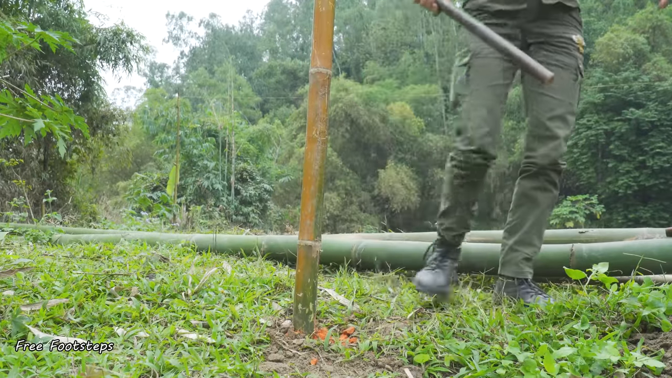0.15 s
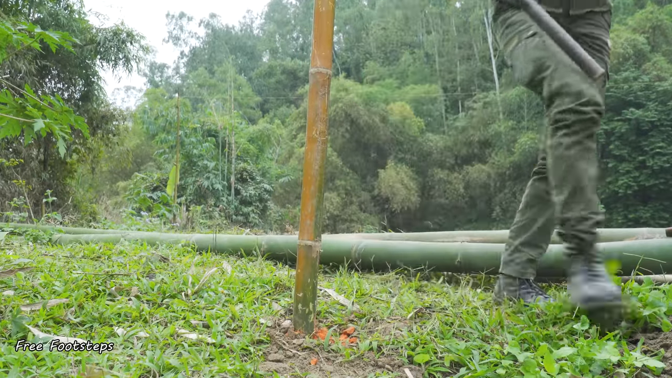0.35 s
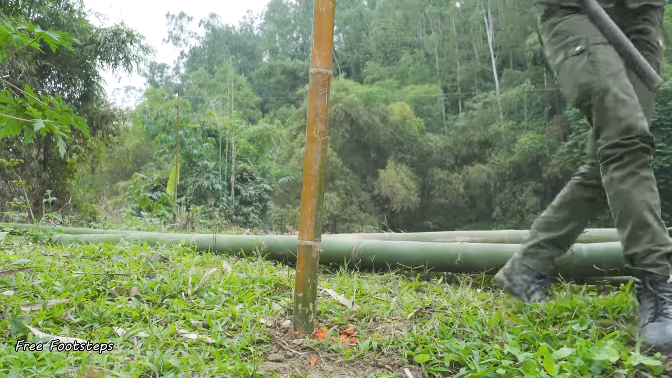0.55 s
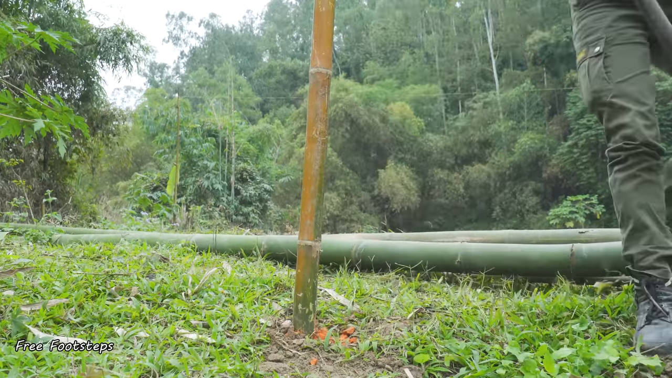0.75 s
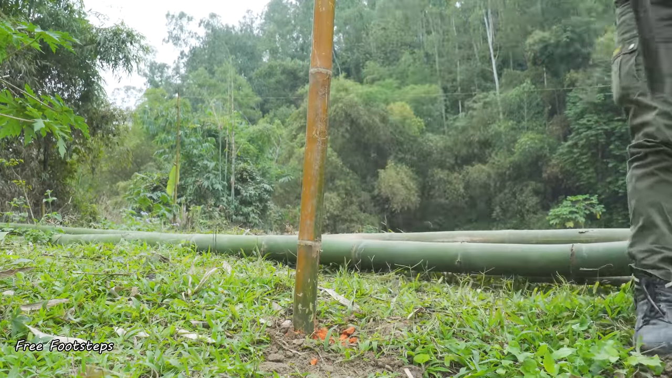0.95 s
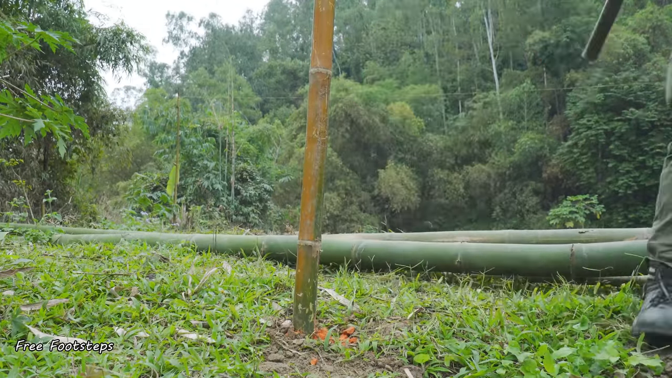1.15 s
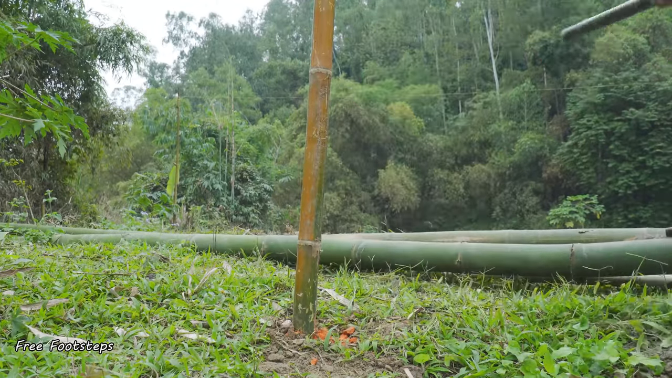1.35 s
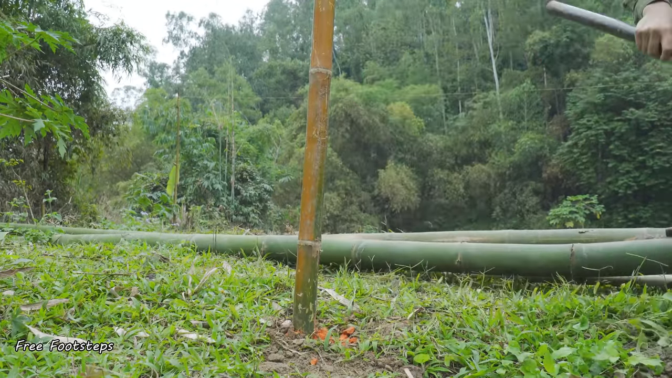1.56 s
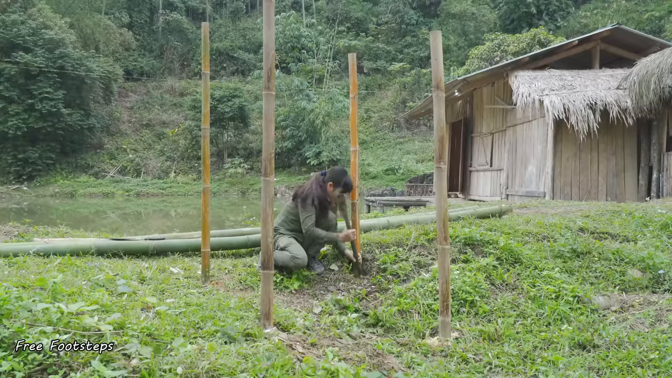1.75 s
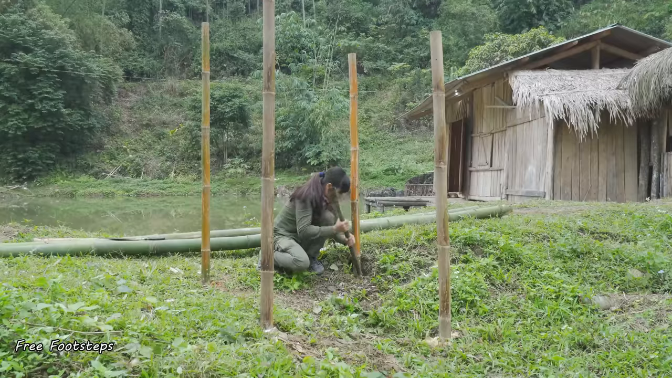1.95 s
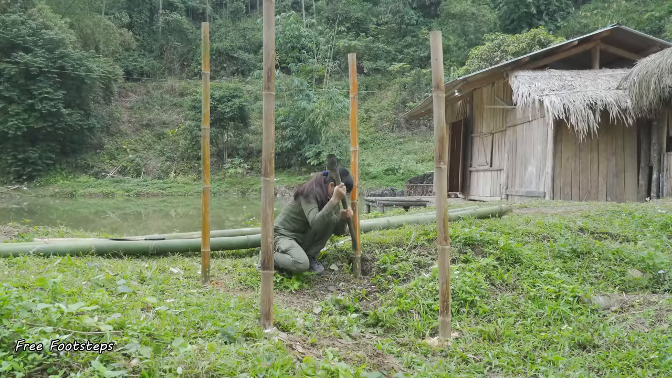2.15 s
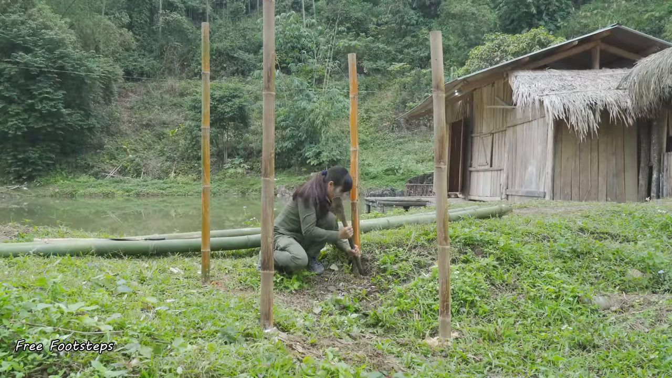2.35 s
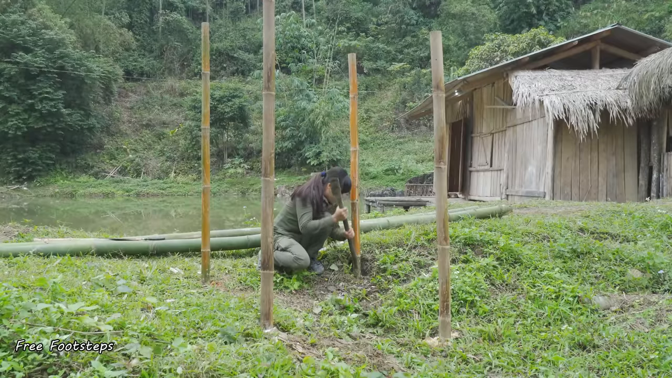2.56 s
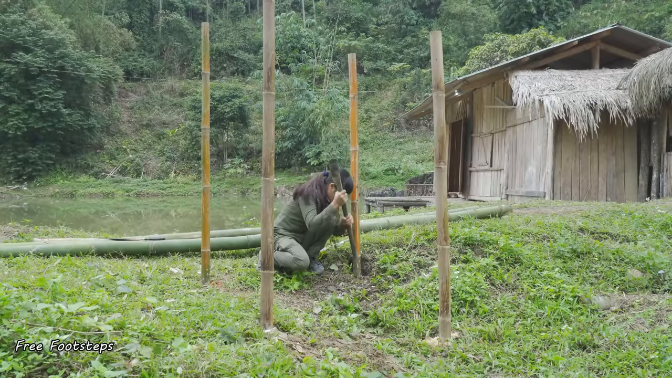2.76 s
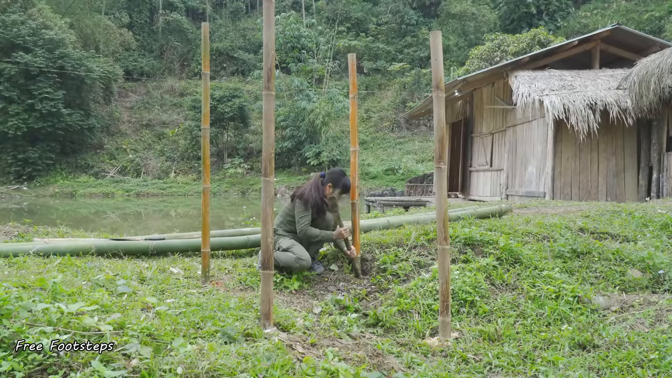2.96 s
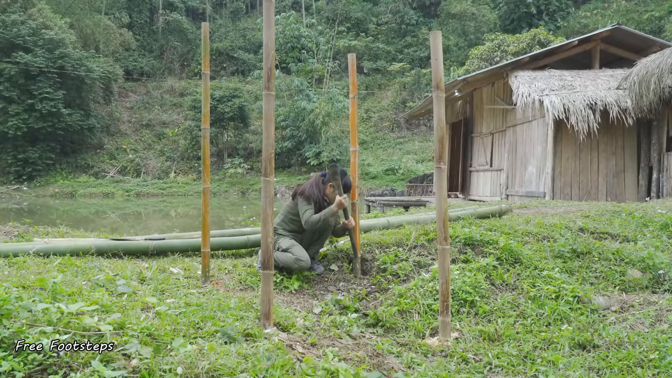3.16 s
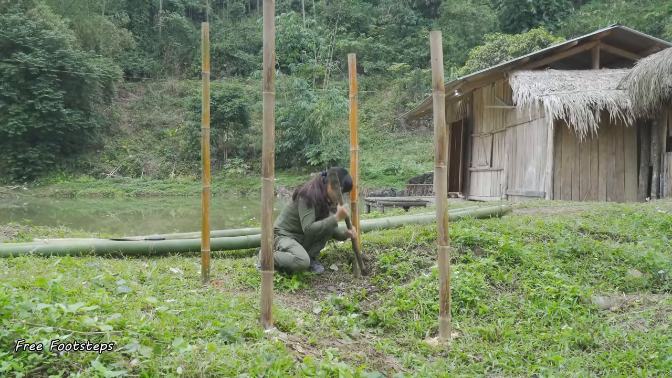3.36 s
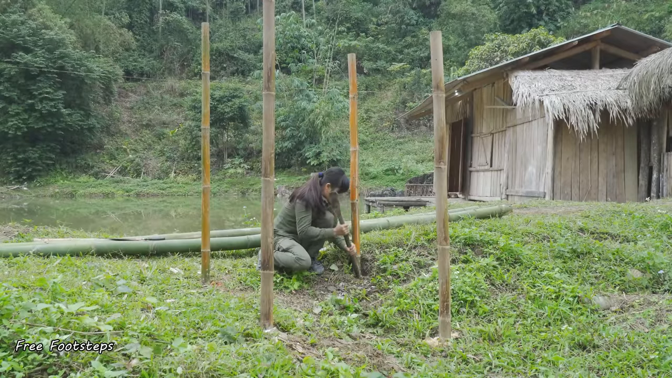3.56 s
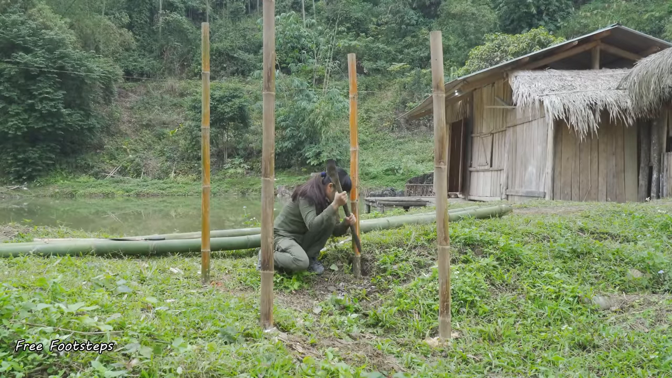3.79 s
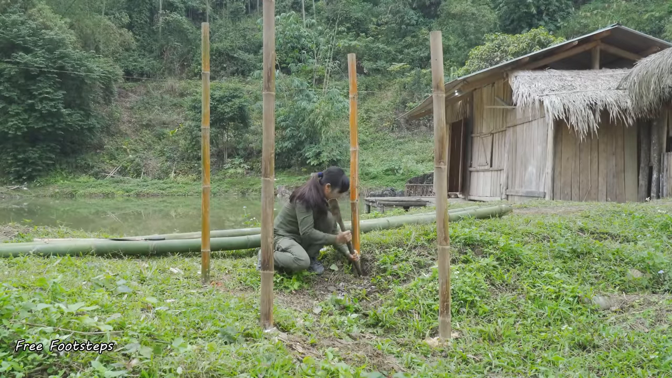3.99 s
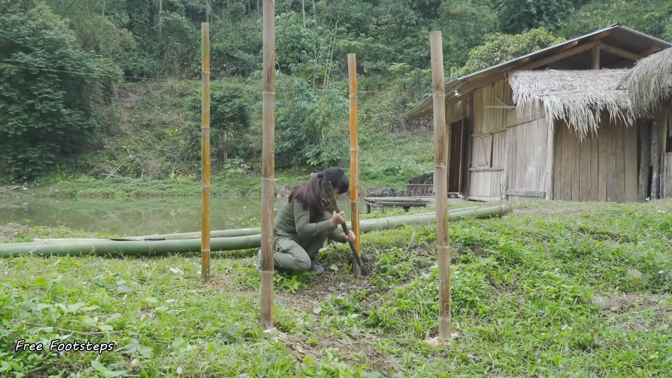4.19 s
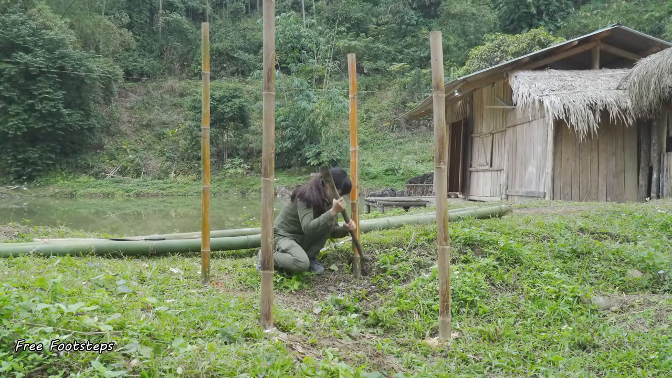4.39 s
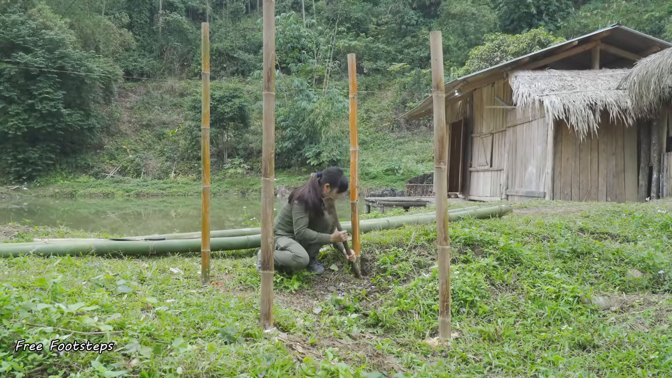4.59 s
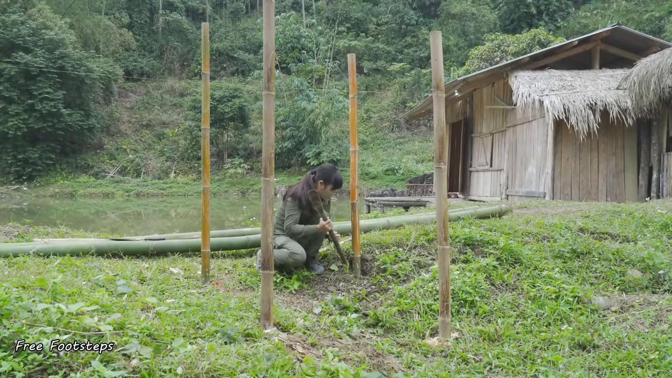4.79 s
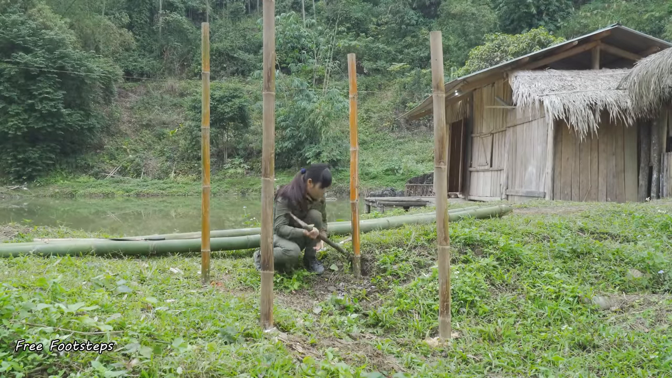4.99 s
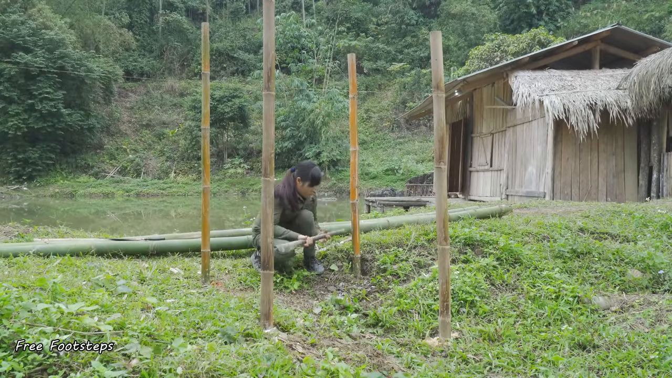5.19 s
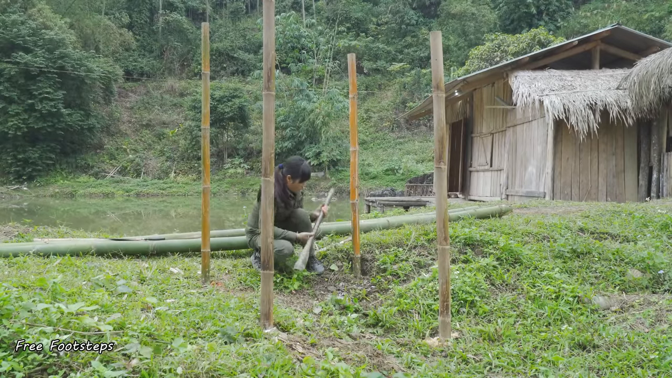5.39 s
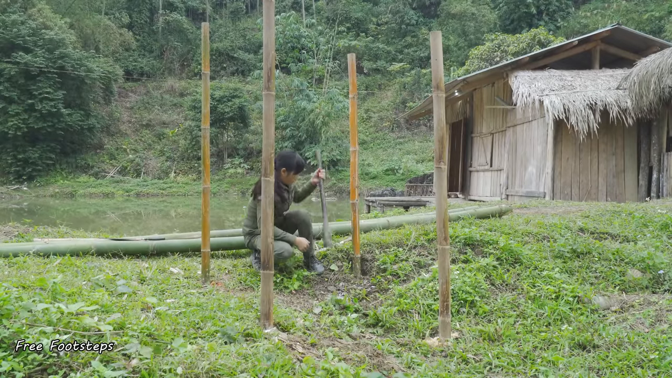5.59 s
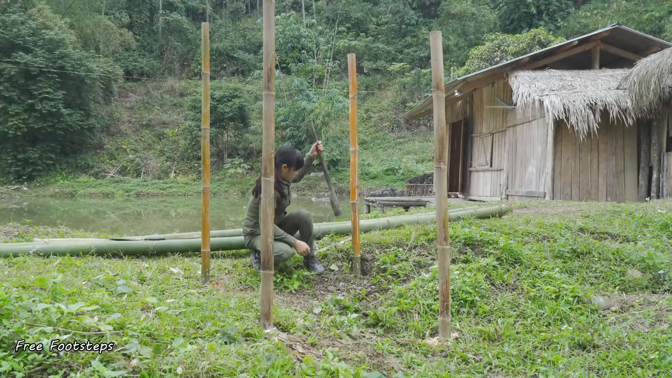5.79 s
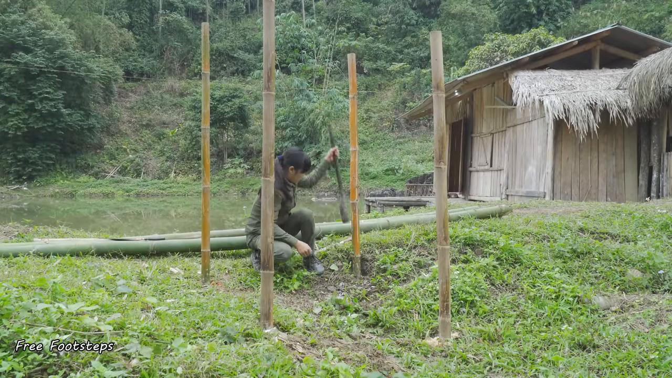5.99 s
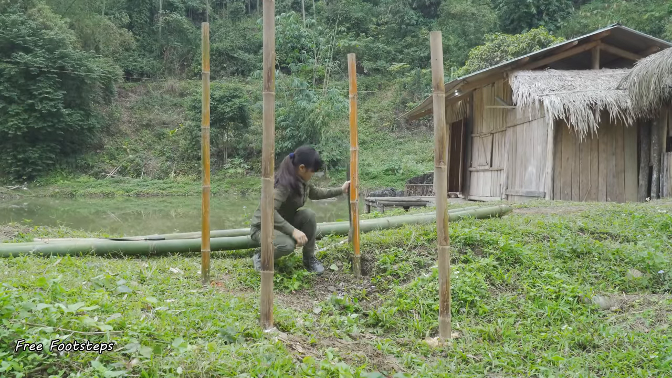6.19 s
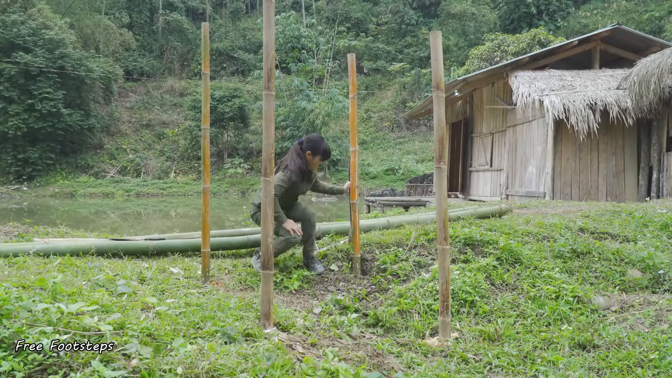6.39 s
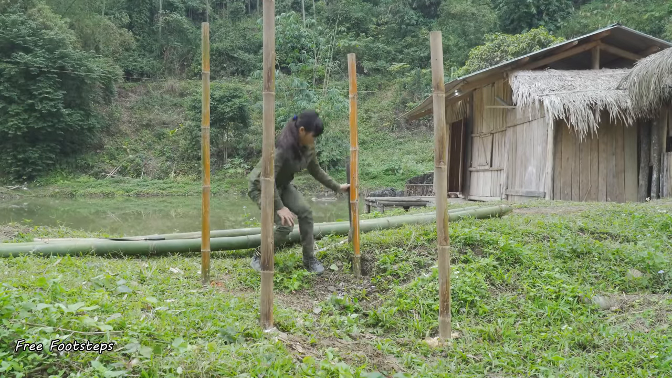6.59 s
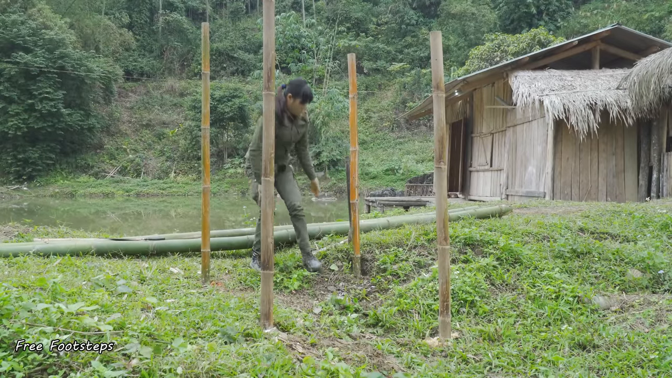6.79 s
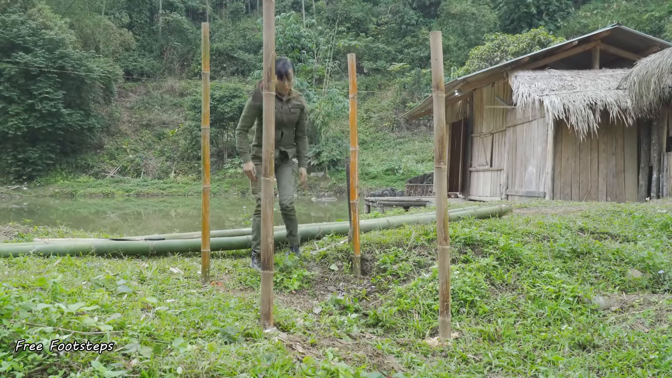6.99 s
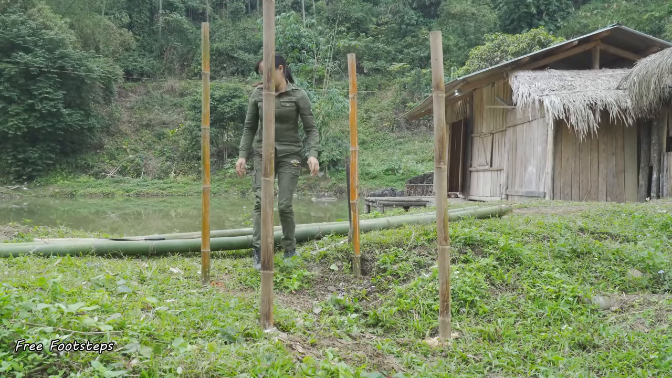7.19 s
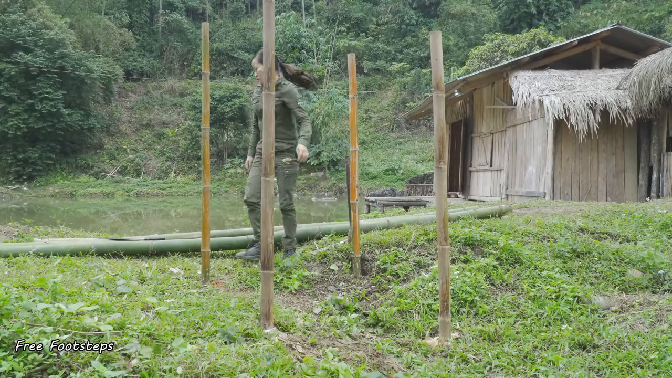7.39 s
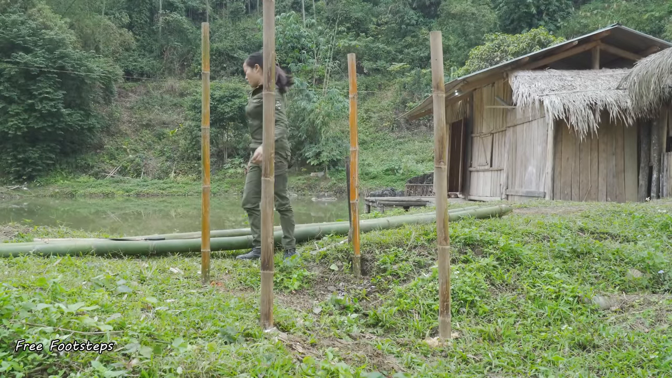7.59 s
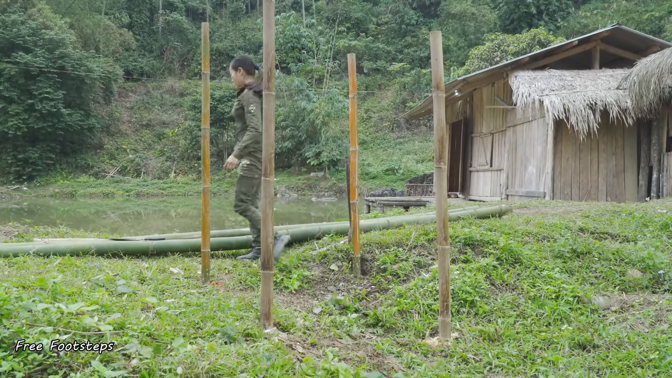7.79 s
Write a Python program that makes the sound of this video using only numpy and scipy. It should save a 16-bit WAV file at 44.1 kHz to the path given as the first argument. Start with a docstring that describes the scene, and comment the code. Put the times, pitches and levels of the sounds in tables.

```python
"""Boots rustle through grass, then a steel bar pounds the soil around a bamboo post in a yard by a hut.
Each blow cracks as filtered noise, rings bar and post as dying sines, thumps the ground and shakes the
microphone stand; delayed and scattered copies echo it off hut and hillside.
Birds or insects trill in the distance as trains of sliding whistles, over the noise hush of a wooded valley."""
import sys
import numpy as np
from scipy import signal
from scipy.fft import rfft, irfft
from scipy.io import wavfile
from scipy.ndimage import uniform_filter1d

SR = 44100
rng = np.random.default_rng(int(sys.argv[2]) if len(sys.argv) > 2 else 0)


def file_out(sig):
    """Save sig as 16-bit WAV at sys.argv[1]."""
    # one column per channel
    cols = np.atleast_2d(sig).T
    # limit, then scale
    lim = np.clip(cols, -1, 1)
    pcm = np.round(lim * 32767).astype(np.int16)
    wavfile.write(sys.argv[1], SR, pcm)


N = 346185  # length in samples


def amp(db):
    """dB to gain."""
    return 10 ** (np.asarray(db) / 20)


def evened(x):
    """Scales to rms 1."""
    return x / np.sqrt(np.mean(x ** 2) + 1e-20)


def read(points, hz):
    """Reads a (Hz, value) table on a log-frequency axis."""
    f, value = np.transpose(points)
    return np.interp(np.log(hz + 1), np.log(f + 1), value)


def add(mix, start_s, sound):
    """Mixes a sound in at its start time, cut off at the end of the mix."""
    part = mix[round(start_s * SR):][:len(sound)]
    part += sound[:len(part)]


def coloured(x, points):
    """Shapes the spectrum of x by a table, then scales to rms 1."""
    spectrum = rfft(x) * amp(read(points, np.fft.rfftfreq(len(x), 1 / SR)))
    return evened(irfft(spectrum, len(x)))


def band(x, lo_hz, hi_hz):
    """Causal band-pass."""
    edges = [lo_hz, min(hi_hz, SR / 2.2)]
    return signal.sosfilt(signal.butter(2, edges, "band", fs=SR, output="sos"), x)


def drift(size):
    """Slow random wandering of rms 1, smoothed twice over size samples."""
    once = uniform_filter1d(rng.standard_normal(N), size)
    return evened(uniform_filter1d(once, size))


def flutter(size, length=N):
    """Quicker random wandering of rms 1, smoothed once over size samples."""
    return evened(uniform_filter1d(rng.standard_normal(length), size))


def ring(modes, length, spread_db):
    """Dying sines of peak 1; random mode levels, as each strike point favours other modes."""
    t = np.arange(length) / SR
    out = np.zeros(length)
    for hz, db, t60_s in modes:
        luck_db = spread_db * rng.standard_normal()
        out += amp(db + luck_db - 60 * t / t60_s) * np.sin(2 * np.pi * hz * t)
    return out / abs(out).max()


def scatter(decays, swell_s):
    """Dense reflections of energy 1 that swell in, each band dying at its own speed."""
    hz, t, z = signal.stft(rng.standard_normal(SR + SR // 2), SR, nperseg=256)
    tail = signal.istft(z * amp(-60 * t / read(decays, hz)[:, None]), SR, nperseg=256)[1]
    tail = tail * np.clip(np.arange(len(tail)) / SR / swell_s, 0, 1) ** 2
    return tail / np.linalg.norm(tail)


# spectrum of the valley air: hz [Hz], density_db [dB, relative]
HUSH_SPECTRUM = [(12, -23.5), (20, 4.5), (116, -3.5), (558, -13), (802, -10), (1090, -8.5), (2020, -20.5),
                 (2530, -14.5), (3250, -20.5), (3740, -16), (4420, -22), (6180, -20.5), (7110, -32.5),
                 (12100, -33), (16000, -39)]
HUSH_RMS_DB, PATCH_DB = -55, 0.6


def valley_hush():
    """Valley air: random short-time spectra whose level varies in drifting patches of time and pitch."""
    frames, hz = N // 256 + 5, np.fft.rfftfreq(1024, 1 / SR)
    real, imaginary, patches = rng.standard_normal((frames, 513, 3)).T
    patches = evened(uniform_filter1d(uniform_filter1d(patches, 12, 0), 14, 1))
    level = amp(read(HUSH_SPECTRUM, hz)[:, None] + PATCH_DB * patches)
    air = signal.istft((real + 1j * imaginary) * level, nperseg=1024, noverlap=768)[1][:N]
    return amp(HUSH_RMS_DB) * evened(air)


# trills: start_s [s], end_s [s], mean_rate [notes per s], first_hz [Hz], last_hz [Hz],
# level_db [dB, before the random note strength]
TRILL_RUNS = [(.012, .752, 47, 3200, 3120, -48), (3.16, 3.2, 50, 3300, 3300, -57),
              (3.2755, 3.645, 53.5, 3350, 3250, -52), (3.8, 3.94, 45, 3700, 4000, -57),
              (4.12, 4.34, 45, 3700, 4350, -54), (4.44, 4.6, 45, 3700, 4350, -54),
              (4.8, 4.945, 45, 3900, 4350, -55), (5.1985, 5.672, 51.8, 3300, 3250, -51),
              (5.75, 5.91, 45, 4000, 3950, -57), (6.42, 6.6, 48, 4000, 3750, -57),
              (7.035, 7.07, 55, 3300, 3300, -58), (7.1005, 7.735, 51.4, 3300, 3230, -51.5),
              (7.17, 7.28, 45, 4100, 4400, -58), (7.53, 7.66, 45, 4150, 4250, -57)]
# single whistles: start_s [s], end_s [s], first_hz [Hz], last_hz [Hz], peak_db [dB]
SINGLE_WHISTLES = [(0.0, .012, 3550, 3250, -45), (.044, .064, 3850, 3200, -44),
                   (.322, .336, 3700, 3600, -49), (7.355, 7.435, 2400, 2950, -59.5),
                   (7.425, 7.5, 2930, 3000, -63)]
# breakpoints of the far warble: time_s [s], level_db [dB, relative], pitch_hz [Hz]
FAR_WARBLE = [(0.0, -55, 3670), (.39, -64.5, 3680), (.85, -62.5, 3710), (1.35, -56, 3664), (1.5, -67, 3795),
              (2.27, -61.5, 3905), (2.65, -64.5, 3950), (2.91, -74, 3790), (3.171, -59, 3725),
              (3.821, -70, 3790), (4.501, -75, 3800), (4.74, -54, 3774), (5.4, -63, 3800),
              (5.62, -64, 4030), (5.85, -62, 3960), (6.199, -61, 3980), (6.5, -67, 3865),
              (6.801, -60.5, 3604), (7.3, -66, 3580), (7.85, -71, 3785)]
# far scatter, for the trees here and for the hillside echoes: hz [Hz], t60_s [s]
FAR_DECAY = [(200, .5), (700, 0.6), (1400, 1.6), (4000, 0.53), (8000, 0.55)]
SLOWING_PER_S2 = 11  # a trill slows by this many notes per s each second
SLIDE_SHARE = .17  # each trill note slides down by this share of its pitch
WARBLE_SWING_DB, WARBLE_FLUTTER_DB, WARBLE_ROAM_HZ = 1.5, 2.4, 60
NOTE_STRENGTH_DB = 2.2  # random spread of note strength
WARBLE_DIRECT_DB, WARBLE_BLUR_DB, TRILL_BLUR_DB = -8, -6.5, -12


def notes(per_s, hz, fall_hz, duty):
    """A train of short whistles, each sliding down in pitch, with a weak octave."""
    turn = np.minimum(np.cumsum(per_s) / SR % 1 / duty, 1)  # progress through a note, 0 to 1
    phase = 2 * np.pi * np.cumsum(hz + fall_hz * (.5 - turn)) / SR
    return np.sin(np.pi * turn) ** 2 * (np.sin(phase) + .06 * np.sin(2 * phase))


def trills():
    """Trains of sliding whistles that slow as they run, and single gliding whistles."""
    out = np.zeros(N)
    for start_s, end_s, mean_rate, first_hz, last_hz, level_db in TRILL_RUNS:
        t = np.arange(0, end_s - start_s, 1 / SR)
        hz = np.linspace(first_hz, last_hz, len(t))
        rate = mean_rate - SLOWING_PER_S2 * (t - t.mean())
        add(out, start_s, amp(level_db) * notes(rate, hz, SLIDE_SHARE * hz, .6))
    out = out * amp(NOTE_STRENGTH_DB * flutter(900))
    for start_s, end_s, first_hz, last_hz, peak_db in SINGLE_WHISTLES:
        hz = np.linspace(first_hz, last_hz, round((end_s - start_s) * SR))
        whistle = np.hanning(len(hz)) ** .5 * np.sin(2 * np.pi * np.cumsum(hz) / SR)
        add(out, start_s, amp(peak_db) * whistle)
    return out


def far_warble():
    """An unbroken train of sliding whistles whose rate, pitch and level wander."""
    t, (time_s, level_db, pitch_hz) = np.arange(N) / SR, np.transpose(FAR_WARBLE)
    rate = 45 * (1 + .15 * flutter(1500))
    hz = np.interp(t, time_s, pitch_hz) + WARBLE_ROAM_HZ * drift(3000)
    wander_db = WARBLE_FLUTTER_DB * flutter(1500) + WARBLE_SWING_DB * drift(3000)
    return evened(notes(rate, hz, 430, 0.29)) * amp(np.interp(t, time_s, level_db) + wander_db)


def callers():
    """Trills, single whistles and the far warble, blurred by scattering off the trees."""
    near, far = trills(), far_warble()
    trees = scatter(FAR_DECAY, 0.0083)[:SR // 4]
    blurred = signal.fftconvolve(amp(TRILL_BLUR_DB) * near + amp(WARBLE_BLUR_DB) * far, trees)[:N]
    return near + amp(WARBLE_DIRECT_DB) * far + blurred


# brushes of grainy noise, mostly boots and cloth in grass, one short burst at the 6.18 s blow:
# peak_s [s], length_s [s], fine_db (rustle) [dB, before flicker], coarse_db (scuff) [dB, before flicker]
GRAINY_BRUSHES = [(0.023, 0.31, -60.5, -60), (.16, 0.47, -56.5, -57.5), (0.263, 0.07, -60, -57),
                  (0.448, 0.082, -53.5, -51.5), (0.53, 0.19, -44, -44.5), (0.665, .11, -48.5, -49),
                  (0.752, 0.12, -48, -51), (1.128, 0.17, -58.5, -51), (1.264, 0.16, -59, -54.5),
                  (1.335, 0.19, -47.5, -53), (1.475, 0.07, -53, -50.5), (1.754, 0.18, -59.5, -60.5),
                  (2.0, 0.074, -68, -74), (2.147, 0.12, -67, -64), (5.12, 0.17, -67, -63),
                  (5.319, 0.067, -66, -75), (5.44, .2, -65, -73), (6.18, 0.031, -45, -43),
                  (6.503, .2, -69, -67.5), (6.956, 0.24, -58.5, -68), (7.1, .16, -58.5, -57.5),
                  (7.302, 0.12, -58.5, -70), (7.423, 0.18, -64.5, -77), (7.68, .12, -66, -70),
                  (7.85, .1, -67, -77)]
# spectrum of the fine grains: hz [Hz], density_db [dB, relative]
FINE_SPECTRUM = [(1180, -48.5), (2000, -1), (2880, -2), (3140, 1), (4300, 0.5), (6200, -1), (11600, -7.5),
                 (16000, -15.5)]
# spectrum of the coarse grains: hz [Hz], density_db [dB, relative]
COARSE_SPECTRUM = [(35, -47.5), (60, 4.5), (324, 2.5), (360, 6), (494, 3), (1030, 5), (3540, -10),
                   (4000, -11), (5200, -43.5), (8800, -120)]
BRUSH_EDGE_DB = -13  # level half a length either side of the peak, relative to it
STIR_DB, STIR_SWING_DB = -68, 4  # the grass never lies quite still
FLICKER_DB = 1.6


def grain_texture(spectrum, grains_per_s):
    """Random grains of uneven size over steady noise, given a spectrum."""
    size = amp(3. * np.minimum(rng.exponential(1, N), 3.3))
    grains = size * (rng.random(N) < grains_per_s / SR) * rng.standard_normal(N)
    return coloured(evened(grains) + .5 * rng.standard_normal(N), spectrum)


def rustle():
    """Dense grains, mostly fine for blades and cloth, coarse for soles; each brush swells and fades."""
    t, (peak_s, length_s, fine_db, coarse_db) = np.arange(N) / SR, np.transpose(GRAINY_BRUSHES)
    sparse_t = t[::64]  # levels are worked out sparsely, then interpolated
    swell_db = BRUSH_EDGE_DB * (2 * (sparse_t - peak_s[:, None]) / length_s[:, None]) ** 2
    out = np.zeros(N)
    # only the coarse layer carries the constant stirring
    for spectrum, db, stir, per_s in ((FINE_SPECTRUM, fine_db, 0, 6000), (COARSE_SPECTRUM, coarse_db, 1, 1200)):
        brush_level = np.sqrt((amp(db[:, None] + swell_db) ** 2).sum(0))
        brushing = np.interp(t, sparse_t, brush_level)
        level = np.hypot(brushing, stir * amp(STIR_DB + STIR_SWING_DB * drift(2000)))
        out += grain_texture(spectrum, per_s) * level * amp(FLICKER_DB * flutter(500))
    return out


# stems and dry blades snapping: start_s [s], peak_db [dB], centre_hz [Hz], width [octaves]
STEM_SNAPS = [(.058, -44, 7800, 2.7), (.1644, -41, 12300, 2.7), (.177, -39.5, 580, 1.08),
              (.188, -43.5, 1360, 0.37), (.244, -36.5, 3630, 3.2), (.327, -41.5, 750, 0.65),
              (.445, -33, 1100, 3.9), (0.488, -43, 1060, 1.1), (.567, -34, 700, 2.6),
              (0.623, -32.5, 1410, 0.82), (.646, -31.5, 1310, 2.9), (0.703, -36.5, 685, 1.3),
              (.8335, -29.5, 3150, 13), (0.903, -44, 553, 0.66), (1.04, -44, 10200, 2.5),
              (1.065, -33, 11000, 4.2), (1.706, -44, 585, 1.2), (1.771, -57, 900, 1),
              (5.758, -52, 11000, 1.1), (7.1462, -39, 10600, 2.7), (7.3422, -49, 11000, 2.2),
              (7.707, -41, 990, 0.9), (7.795, -44, 690, 1.1)]
# thin blades die sooner: hz [Hz], t60_s [s]
SNAP_DECAY_BY_PITCH = [(1000, 0.03), (9000, 0.0099)]


def snaps():
    """Short dying bursts of noise around each centre, higher ones shorter."""
    out, t = np.zeros(N), np.arange(900) / SR
    for start_s, peak_db, centre_hz, octaves in STEM_SNAPS:
        half_width = 2 ** (octaves / 2)
        noise = rng.standard_normal(len(t)) * amp(-60 * t / read(SNAP_DECAY_BY_PITCH, centre_hz))
        burst = band(noise, centre_hz / half_width, centre_hz * half_width)
        add(out, start_s, amp(peak_db) * burst / abs(burst).max())
    return out


# smeared echoes off hut walls and roof: delay_s [s], level_db [dB]
HUT_ECHOES = [(0.03, -39), (0.063, -31.5), (.092, -34), (.122, -53.5)]
# near scatter: hz [Hz], t60_s [s]
YARD_DECAY = [(100, 0.066), (500, 0.28), (1400, 0.3), (4000, 0.23), (10000, 0.4)]
YARD_DB, HILL_DB = -14, -40.5
FAR_SLOPE_S, FAR_SLOPE_DB, FAR_SLOPE_BAND_HZ = .17, -38, (700, 1650)  # a late, slowly swelling echo


def yard(x):
    """Smeared echoes off the hut, near scatter and faint long tails off the hillside."""
    taps = np.zeros(SR // 5)
    for delay_s, level_db in HUT_ECHOES:
        smear = rng.standard_normal(600) * np.hanning(600) / np.sqrt(225)
        add(taps, delay_s, amp(level_db) * smear)
    out = signal.fftconvolve(band(x, 500, 5500), taps)[:N]
    out += amp(YARD_DB) * signal.fftconvolve(x, scatter(YARD_DECAY, 0.0071))[:N]
    late = signal.fftconvolve(band(x, *FAR_SLOPE_BAND_HZ), scatter(FAR_DECAY, 0.11))
    add(out, FAR_SLOPE_S, amp(FAR_SLOPE_DB) * late)
    hillside = signal.fftconvolve(band(x, 700, 4100), scatter(FAR_DECAY, 0.063))[:N]
    return out + amp(HILL_DB) * hillside


# what the ground carries: start_s [s], boom_db [dB], thump_db [dB], shake_db [dB]
GROUND_QUAKES = [(1.281, -41.5, -45, -49), (1.491, -42, -47, -38.5), (1.865, -37.5, -56, -29.5),
                 (2.45, -46.5, -45, -33.5), (2.981, -26.5, -24, -25.5), (3.525, -24.5, -32, -27.5),
                 (4.075, -37, -46.5, -31.5), (4.615, -22.5, -27.5, -26), (6.182, -35, -32.5, -32.5)]
# microphone stand swaying: hz [Hz], level_db [dB, relative], t60_s [s]
STAND_MODES = [(27.48, -7, 1.76), (33.4, -3.5, 0.59), (56, -2.5, 0.34)]
# air in the hollow post: hz [Hz], level_db [dB, relative], t60_s [s]
POST_AIR_MODES = [(160, 0, 0.29)]
# the soil heaving: hz [Hz], level_db [dB, relative], t60_s [s]
SOIL_MODES = [(105, -8, 0.037), (72, -9, .13)]


def ground_shake():
    """Low dying sines: the stand shakes, the hollow post booms and the soil thumps."""
    out = np.zeros(N)
    for start_s, boom_db, thump_db, shake_db in GROUND_QUAKES:
        add(out, start_s, amp(shake_db) * ring(STAND_MODES, SR, 1))
        add(out, start_s, amp(boom_db) * ring(POST_AIR_MODES, SR, 0))
        add(out, start_s, amp(thump_db) * ring(SOIL_MODES, SR, 0))
    return out


FAVOUR_DB = 9  # lost per octave by modes away from the crack


def struck(modes, crack_hz, share):
    """Favours the modes near the crack and scales each ring's length by the ring share."""
    return [(hz, db - FAVOUR_DB * abs(np.log2(hz / crack_hz)), t60_s * share) for hz, db, t60_s in modes]


# contacts of the bar, and at 4.634 s a close echo of the blow before it:
# start_s [s], crack_db [dB], crack_hz [Hz], thud_db [dB], thud_hz [Hz], post_db [dB], bar_db [dB],
# grit_db [dB], crumble_t60_s [s], ring_share [factor on ring length]; each dB is a layer's gain
BLOW_SOUNDS = [(1.2729, -31.5, 1200, -21, 292, -17, -28.5, -41, 0.11, 0.9),
               (1.338, -54, 1500, -58, 200, -39, -50.5, -48, 0.04, .7),
               (1.481, -23, 800, -35, 502, -55, -35, -48, 0.011, 0.83),
               (1.4867, -23, 600, -26.5, 463, -42, -59, -53, 0.038, 0.77),
               (1.519, -46, 740, -37, 270, -39, -40, -55, .045, 0.6),
               (1.8499, -18, 2190, -14.5, 484, -21, -36, -66, 0.04, .8),
               (1.855, -26.5, 1400, -12.5, 487, -7, -8.5, -108, 0.12, 0.39),
               (1.8608, -20, 1400, -8, 284, -6.5, -15, -93, 0.08, 0.57),
               (2.427, -56, 2300, -30.5, 155, -51, -42, -48.5, 0.065, .7),
               (2.437, -50, 2300, -38, 198, -51, -41.5, -61, 0.031, 1.1),
               (2.4427, -36.5, 1200, -29, 278, -19.5, -26, -37, 0.056, 0.48),
               (2.9765, -14, 3150, -4.5, 217, -8.5, -5, -27, 0.073, 0.69),
               (2.9858, -10.5, 1010, -16, 513, -18, -5, -23.5, 0.054, 0.3),
               (3.519, -4, 2130, -4.5, 230, -2.5, -41, -37.5, 0.02, 0.56),
               (3.525, -5, 890, -10.5, 381, -25, -26.5, -24.5, 0.018, 1),
               (3.529, -22, 1440, -22, 419, -9.5, -12, -26, 0.12, 0.56),
               (4.057, -33, 740, -25.5, 266, -52, -61, -70, 0.054, .7),
               (4.069, -56, 3333, -13, 277, -16, -17, -35.5, 0.062, .6),
               (4.608, -7.5, 2800, -11, 220, -0.5, 2.5, -39, 0.043, 0.96),
               (4.634, -30, 2500, -24, 200, -11.5, -15, -47.5, 0.087, 0.75),
               (6.1181, -39, 1250, -67.5, 390, -28, -57, -66, 0.053, 0.53),
               (6.1755, -27.5, 3780, -20, 179, -52, -50.5, -34, 0.02, 0.58),
               (6.179, -24, 1680, -32.5, 278, -29, -43, -31, 0.023, .6)]
# rings of the post: hz [Hz], level_db [dB, relative], t60_s [s, before ring_share]
POST_MODES = [(420, -4, .03), (540, -6, .03), (860, -1, .035), (1150, -2, .055), (1385, 0, .06),
              (1468, -1, .07), (1555, -4, .05), (1640, -1, .07), (1918, -4, .04)]
# rings of the bar: hz [Hz], level_db [dB, relative], t60_s [s, before ring_share]
BAR_MODES = [(2300, 3, .045), (2545, -10, .05), (2826, -13, .04), (3170, -4, .04), (3250, 0, .065),
             (3515, 0, .05), (3842, -2, .06), (3930, -5, .04), (4560, -25, .13), (4950, -19, .04),
             (5410, -12, .035), (6050, -20, .04), (6500, -15, .035)]
CRACK_WIDTH = 1.475  # a crack spans this frequency ratio either side of its centre
THUD_T60_S, THUD_RISE_S, ONSET_RISE_S = .033, .001, .0005
LUMPS_DB = 2  # unevenness of the crumbling soil
POST_TOP_HZ = 1350  # the post is woken as if by a crack no higher than this
POST_SPREAD_DB, BAR_SPREAD_DB = 2.83, 1.27


def crumbling(t, t60_s):
    """Soil crumbling in uneven lumps: dying noise, sharpest at its start."""
    level_db = LUMPS_DB * flutter(60, len(t)) - 60 * t / t60_s
    crumble = rng.standard_normal(len(t)) * amp(level_db) * np.minimum(t / 0.0014, 1)
    return crumble * (3 + 5 * np.exp(-t / 0.0019))


def thud(t, hz):
    """The ground is pushed in and springs back in a fast-dying low tone with a weak upper partial."""
    push = np.cos(2 * np.pi * hz * (t - THUD_RISE_S / 2)) + 0.22 * np.sin(2 * np.pi * 1.6 * hz * t)
    return amp(-60 * t / THUD_T60_S) * push * np.minimum(t / THUD_RISE_S, 1)


def blows():
    """Cracks and grit as filtered noise, a ground thud, and post and bar ringing as dying sines."""
    out, t = np.zeros(N), np.arange(6000) / SR
    for (start_s, crack_db, crack_hz, thud_db, thud_hz, post_db, bar_db, grit_db,
         crumble_t60_s, ring_share) in BLOW_SOUNDS:
        crumble = crumbling(t, crumble_t60_s)
        chatter = np.r_[1, .025 * crumble[:2000]]  # the strike, then lumps that keep knocking bar and post
        sound = amp(crack_db) * band(crumble, crack_hz / CRACK_WIDTH, crack_hz * CRACK_WIDTH)
        sound += amp(grit_db) * (band(crumble, 4800, 6800) + 0.25 * band(crumble, 6500, 12500))
        sound += amp(thud_db) * thud(t, thud_hz)
        post = ring(struck(POST_MODES, min(crack_hz, POST_TOP_HZ), ring_share), len(t), POST_SPREAD_DB)
        bar = ring(struck(BAR_MODES, crack_hz, ring_share), len(t), BAR_SPREAD_DB)
        sound += signal.fftconvolve(amp(post_db) * post + amp(bar_db) * bar, chatter)[:len(t)]
        add(out, start_s, sound * np.minimum(t / ONSET_RISE_S, 1))
    return out


def scene():
    """All sources, mono; blows and snaps also echo around the yard."""
    echoing = blows() + snaps()
    background = valley_hush() + callers() + rustle()
    return (background + ground_shake() + yard(echoing) + echoing)[None]


EDGE_HZ = 16200  # top of the band


def record(dry):
    clipped = np.clip(dry, -1.02, 1.02)
    lowpass = signal.firwin(255, EDGE_HZ, window=("kaiser", 7), fs=SR)
    return signal.oaconvolve(clipped, lowpass[None], "same")


dry = scene()
out = record(dry)
file_out(out)
```